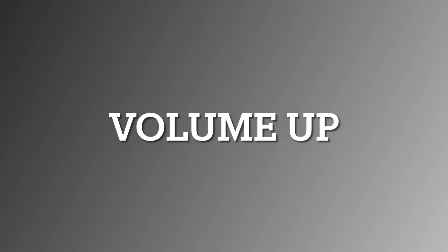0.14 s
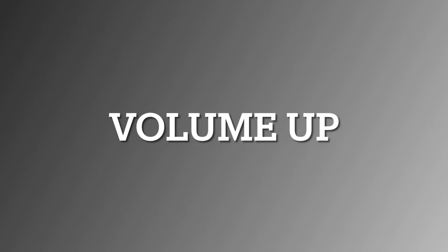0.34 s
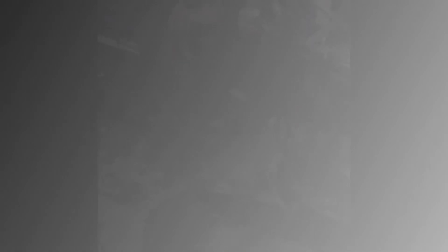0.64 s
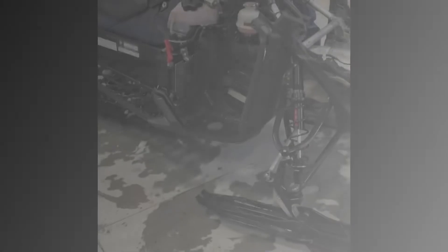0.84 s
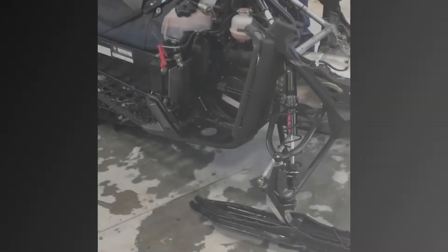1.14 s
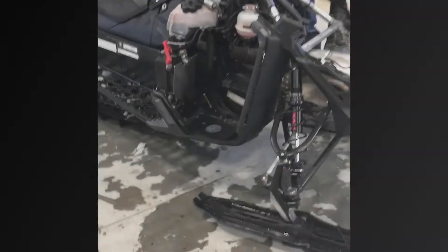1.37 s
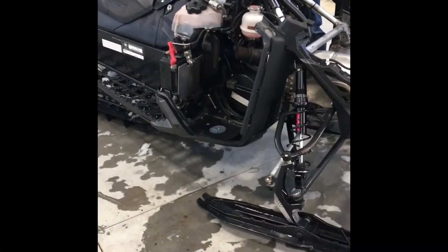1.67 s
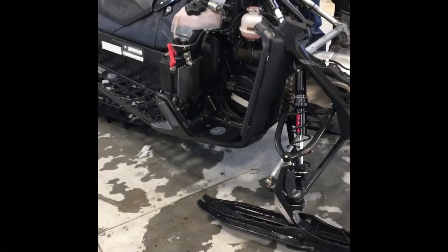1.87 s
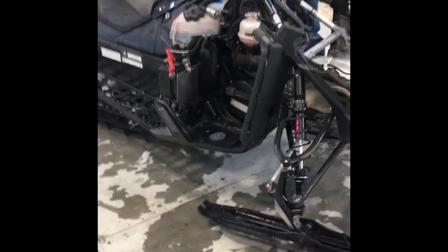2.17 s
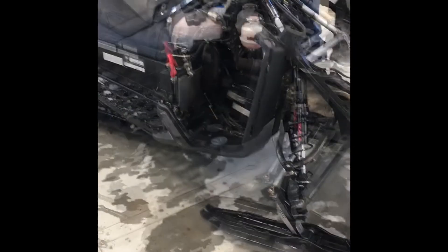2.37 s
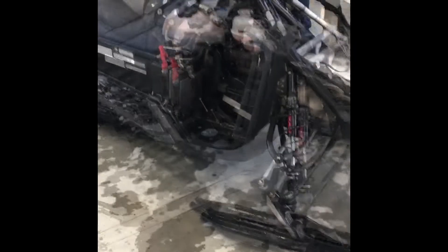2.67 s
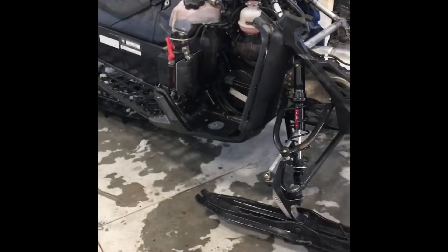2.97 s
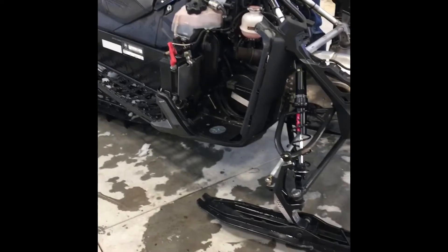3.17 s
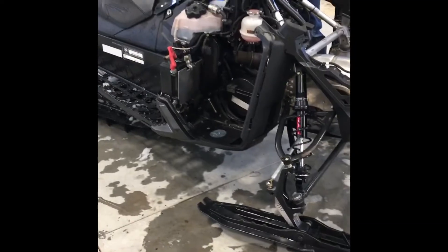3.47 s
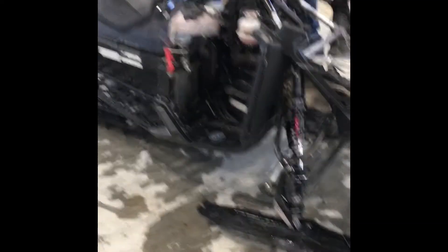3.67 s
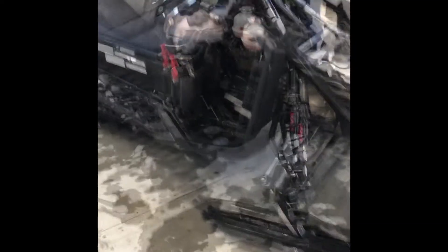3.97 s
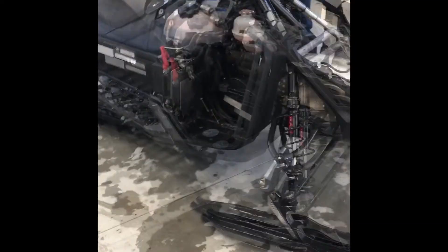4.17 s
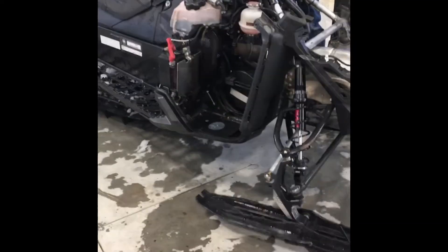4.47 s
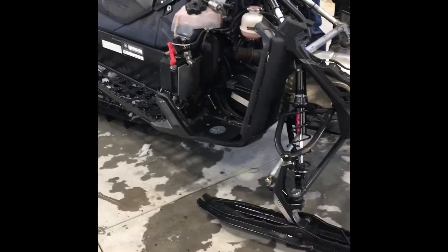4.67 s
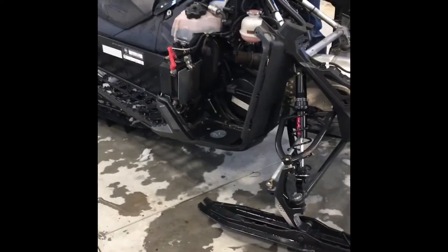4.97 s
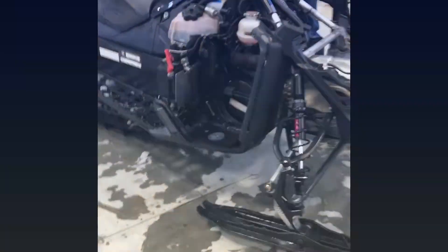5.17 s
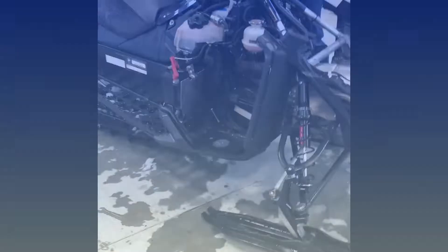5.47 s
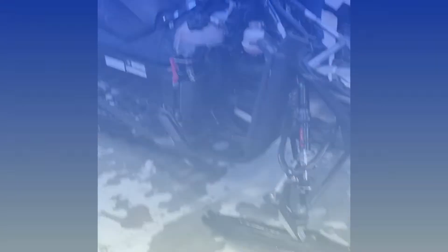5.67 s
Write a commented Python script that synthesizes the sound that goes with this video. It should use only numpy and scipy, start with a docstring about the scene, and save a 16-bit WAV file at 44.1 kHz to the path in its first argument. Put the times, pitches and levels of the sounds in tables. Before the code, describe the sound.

After a brief silence, an open-piped two-stroke snowmobile engine fades in fast under harsh, stuttering hiss bursts. Its level suddenly dips, then swells back to a loud, buzzy, slightly wandering idle with metallic rattle. Switched off, it sinks through slowing low puffs to a small knock. The same run comes three times, each start overlapping the previous stop. Close microphone in a hard, reverberant workshop.

```python
"""In a reverberant workshop an unmuffled two-stroke snowmobile engine idles at about 49 firings a second.
It fades in under harsh hissing bursts, dips in level, idles, is switched off, and friction brakes it to a stop.
Pulses timed by the crank ring the pipe and panels and gate coloured noise; sinking tones make the run-down.
This one short run is heard three times in a loop, each start overlapping the previous stop."""
import sys
import numpy as np
from scipy import signal
from scipy.fft import rfft, irfft, next_fast_len
from scipy.io import wavfile
from scipy.ndimage import uniform_filter1d

SR = 44100
rng = np.random.default_rng(int(sys.argv[2]) if len(sys.argv) > 2 else 0)


def dump_mix(stems):
    """Bounce the given channels to the path in sys.argv[1] as a 16-bit WAV at rate SR."""
    frames = np.atleast_2d(stems).T  # one column per channel
    limited = np.clip(frames, -1, 1)  # hard clip at full scale
    pcm = np.round(limited * 32767).astype(np.int16)
    wavfile.write(sys.argv[1], SR, pcm)


N = 257089
T = np.arange(N) / SR  # time of each sample (s)

# The wandering idle. Each row: time in seconds, speed in firings per second.
IDLE_SPEED = [(0.6, 48.11), (0.7, 48.94), (0.85, 48.05), (1.02, 48.85), (1.17, 50.33), (1.25, 49.86),
              (1.33, 48.71), (1.42, 49.85), (1.55, 49.85), (1.75, 50.2), (1.96, 48.4), (2.1, 49.06),
              (2.37, 48.23)]
# Hissing bursts. Each row: start in seconds, length in seconds, relative level in dB.
HISS_BURSTS = [(0.616, 0.017, -54), (0.637, 0.041, -48), (0.687, 0.033, -44), (0.737, 0.019, -43),
               (0.757, 0.034, -38), (0.788, 0.061, -49.5), (0.841, 0.013, -36), (0.857, 0.022, -33.5)]
# A loose part chinks. Each row: start in seconds, level in dB.
CHINKS = [(1.032, -67), (1.131, -56), (1.757, -52.5), (1.873, -57)]
# The exhaust pipe's response. Each row: multiple of 49.3 Hz, gain in dB.
PIPE_HARMONICS = [(1, -7.5), (2, -10.5), (3, -7.5), (4, -15.5), (5, -7.5), (6, -15), (7, 4.5), (8, -7),
                  (9, -16.5), (10, -2.5), (11, -21), (12, -27), (13, -25), (14, -19)]
# Colour of the port's crack. Each row: frequency in Hz, relative level in dB per Hz.
BARK_COLOUR = [(400, -31), (600, -3), (660, -7.5), (720, -5), (880, -7.5), (980, -4.5), (1110, -6.5),
               (1480, -5.5), (1700, -19), (2000, -18.5), (2450, -14), (2800, -26), (3200, -34),
               (8000, -110)]
# Colour of the mechanical rattle. Each row: frequency in Hz, relative level in dB per Hz.
CLATTER_COLOUR = [(1500, -37), (2800, 10), (3400, -1), (4000, 4.5), (4500, -1.5), (5000, 0.5), (6700, 2),
                  (7800, 0), (8900, -1), (10400, -6), (12300, -4), (15800, -14)]
# Colour of the hissing bursts. Each row: frequency in Hz, relative level in dB per Hz.
HISS_COLOUR = [(400, -28), (700, -5.5), (1200, 19.5), (1500, 3), (1800, -3.5), (2500, 9.5), (3200, -8),
               (3700, -13.5), (5500, -10.5), (7000, -2), (9200, -1), (10400, -10), (13000, -7),
               (15800, -18)]
# Colour of the uneven combustion. Each row: frequency in Hz, relative level in dB per Hz.
CHURN_COLOUR = [(30, -44), (70, -16.5), (120, -10.5), (190, -12), (245, -4.5), (295, -11), (350, -10.5),
                (440, -5.5), (500, -7), (580, -15), (900, -25.5), (3000, -100)]
# Ringing metal parts. Each row: frequency in Hz, width in Hz, gain in dB.
METAL_MODES = [(3690, 50, -2), (3970, 110, 0), (4380, 70, 0), (4540, 70, 2), (6750, 120, -2),
               (8850, 120, -1)]
# Resonances of pipe walls and body panels. Each row: frequency in Hz, width in Hz, gain in dB.
PANEL_MODES = [(143, 14, 1), (245, 30, 4), (624, 18, -8), (878, 12, 1), (1080, 14, 0), (1122, 18, 0),
               (1172, 16, -2), (1325, 36, -8), (2722, 26, -4.5), (3660, 70, -18)]
# Loose side panels that boom when a low idle meets their pitch.
# Each row: frequency in Hz, width in Hz, gain in dB.
BOOM_MODES = [(143.1, 4.7, -5), (244, 7, -1.5), (870, 4.8, -5)]
# Standing waves of the room. Each row: frequency in Hz, width in Hz, gain in dB.
STANDING_WAVES = [(240, 5, 4), (249, 4, 3), (340, 3.5, -12), (386, 4, -1), (402, 4, -3), (478, 4, 2),
                  (491, 4, -3)]
# The workshop's reverberation. Each row: frequency in Hz, time to die by 60 dB in seconds.
WORKSHOP_T60 = [(60, 0.45), (240, 1.85), (500, 1.67), (1400, 1.62), (3500, 1.92), (8000, 0.8), (15000, 0.5)]

LOOP_S = 22 / 15  # spacing of the repeats
START, CUT = 0.57, 2.438  # the engine begins to fade in; the firings have died away (s)
FADE_IN_S, SPARK_FADE_S = 0.36, 0.066  # rise of the running engine; weakening of the firings before CUT
DIP_AT, DIP_FALL_S, DIP_RECOVER_S = 0.872, 0.027, 0.27  # start of the dip (s), its fall, its recovery constant
EASE_AT = 1.99  # from here the level eases off towards the stop (s)
PULL_DB, PULL_SMOOTH_S = 0.1661, 0.049  # drone gain per (firing/s) gained each second; its smoothing
STOP, FRICTION_HZ_PER_S = 2.852, 117.6  # standstill (s); strokes per second lost each second on the way
PUMP_AT, PUMP_HZ, PUMP_SINK_S = 2.36, 144.7, 0.57  # pitch starts to fall (s), first pitch, time constant
PUMP_PEAK_AT, PUMP_SWELL_S, PUMP_DB = 2.455, 0.085, -35  # loudest moment (s), half width, peak level
PUFF_DB, PUFF_CYCLES = -32.5, 0.75  # peak level of a full puff; its half length in cycles
PUFF_WEAK_HZ = 10  # crank speed around which puffs weaken
LAST_STROKE = 0.23  # share of a stroke that the crank still turns after the last puff
TOP_HZ = 15900  # band limit


def amp(db):
    """Decibels to gain."""
    return 10 ** (np.asarray(db) / 20)


def unit(x):
    """Scale to rms 1 while the engine runs."""
    running = x[(T > START) & (T < CUT)]
    return x / np.sqrt(np.mean(running ** 2) + 1e-20)


def along(points, hz):
    """Read (Hz, value) points on a log frequency axis."""
    f, value = np.transpose(points)
    return np.interp(np.log(hz + 1), np.log(f + 1), value)


def ramp(start, length_s):
    """A straight rise from 0 to 1."""
    return np.clip((T - start) / length_s, 0, 1)


def noise():
    """Fresh white noise."""
    return rng.standard_normal(N)


def filtered(x, response):
    """x times a complex response of frequency."""
    size = next_fast_len(N + SR // 2)
    hz = np.fft.rfftfreq(size, 1 / SR)
    return irfft(rfft(x, size) * response(hz), size)[:N]


def coloured(x, points, size=16384):
    """x through the causal, minimum-phase filter that has this (Hz, dB) spectrum."""
    gain = amp(along(points, np.fft.rfftfreq(size, 1 / SR)))
    cepstrum = irfft(np.log(gain))
    # folding the cepstrum forward makes the filter causal
    cepstrum[1:size // 2] *= 2
    cepstrum[size // 2 + 1:] = 0
    impulse = irfft(np.exp(rfft(cepstrum)))[:size // 2]
    return signal.fftconvolve(x, impulse)[:N]


def resonances(modes):
    """The summed response of (Hz, width Hz, dB) resonances."""
    def response(f):
        return sum(amp(db) * 1j * f * w / (c * c - f * f + 1j * f * w) for c, w, db in modes)
    return response


def delayed(x, lag_s):
    """x arriving a little later."""
    return filtered(x, lambda hz: np.exp(-2j * np.pi * hz * lag_s))


def workshop(x):
    """The room's answer: a decaying noise tail, each frequency dying at its own speed."""
    hz, t, grains = signal.stft(rng.standard_normal(SR), SR, nperseg=256)
    decay = amp(-60 * t / along(WORKSHOP_T60, hz)[:, None])
    tail = signal.istft(grains * decay, SR, nperseg=256)[1]
    return signal.fftconvolve(x, tail / np.linalg.norm(tail))[:N]


def in_room(x, wet_db):
    """A running sound plus the room's answer, at rms 1."""
    return unit(unit(x) + amp(wet_db) * unit(workshop(x)))


def idle_speed():
    """The wandering idle at every sample (firings per second)."""
    s, speed = np.transpose(IDLE_SPEED)
    return np.interp(T, s, speed)


def crank():
    """Firings counted over time, one at each whole number: the crank idles, then friction brakes it evenly."""
    speed = np.clip(FRICTION_HZ_PER_S * (STOP - T), 0, idle_speed())
    count = np.cumsum(speed) / SR
    return count - np.interp(1.6095, T, count)  # count zero falls at 1.6095 s


def firings(turn, jitter_s, scatter_db):
    """One pulse per firing, a little off in time and size; the last ones weaken."""
    whole = np.arange(-60, 45)
    chance = rng.standard_normal((len(whole), 2))
    s = np.interp(whole, turn, T) + jitter_s * chance[:, 0]
    size = amp(scatter_db * chance[:, 1]) * np.clip((CUT - s) / SPARK_FADE_S, 0, 1)
    # windowed sinc pulses land between samples
    taps = np.floor(s * SR).astype(int)[:, None] + np.arange(-7, 9)
    off = taps - s[:, None] * SR
    pulse = size[:, None] * np.sinc(off) * np.sinc(off / 8)
    return np.bincount(taps.ravel(), pulse.ravel(), N)


def gated(pulses, decay_s, steady):
    """Noise that flares with each pulse, over a steady share that fades as the engine coasts."""
    flare = np.abs(signal.lfilter([1], [1, -np.exp(-1 / (decay_s * SR))], pulses))
    coasting = amp(-55 * np.maximum(T - CUT + SPARK_FADE_S, 0))
    return unit(noise() * (unit(flare) + steady * coasting))


def level(idle_db, harsh_db, dip_db, ease_db_per_s):
    """A layer's gain: fade-in, an offset under the bursts, a dip, recovery to idle, then easing off."""
    dropped = ramp(DIP_AT, DIP_FALL_S)
    dip = np.exp(-np.maximum(T - DIP_AT - DIP_FALL_S, 0) / DIP_RECOVER_S)
    db = idle_db + harsh_db * (1 - dropped)
    db = db - dip_db * dropped * dip
    db = db - ease_db_per_s * np.maximum(T - EASE_AT, 0)
    return ramp(START, FADE_IN_S) * amp(db)


def pull():
    """Strong firings speed the crank up and sound louder; weak ones let it sag: gain follows acceleration."""
    gaining = np.gradient(idle_speed()) * SR
    return amp(PULL_DB * uniform_filter1d(gaining, int(PULL_SMOOTH_S * SR)))


def exhaust(turn):
    """Pressure pulses ring the open pipe: a thud below, a drone near 350 Hz above."""
    pulses = unit(firings(turn, jitter_s=.00008, scatter_db=.9))
    harmonics = [(49.3 * k, db) for k, db in PIPE_HARMONICS]
    pipe = [(25, -40)] + harmonics + [(900, -60), (3000, -120)]
    blast = coloured(pulses, pipe)

    def low(hz):
        return 1 / (1 + (hz / 200) ** 12)

    # the pipe passes its deeper tones later than the crack of the port
    thud = delayed(filtered(blast, low), lag_s=0.0047)
    drone = delayed(filtered(blast, lambda hz: 1 - low(hz)), lag_s=0.0015)
    # standing waves swell and beat as the idle speed wanders past them
    drone = drone + filtered(drone, resonances(STANDING_WAVES))
    # uneven combustion churns between the harmonics
    churn = coloured(gated(pulses, decay_s=0.025, steady=1.0), CHURN_COLOUR)
    drone = in_room(drone, wet_db=-11) + amp(-11.5) * in_room(churn, wet_db=7.5)

    thud_gain = level(idle_db=-32.5, harsh_db=1.0, dip_db=12.5, ease_db_per_s=4.5)
    drone_gain = level(idle_db=-24.0, harsh_db=-3.5, dip_db=17.5, ease_db_per_s=12) * pull()
    return thud_gain * in_room(thud, wet_db=-14) + drone_gain * drone


def bark(turn):
    """The port opens with a sharp crack and a puff of turbulent gas; both shake the panels."""
    pulses = firings(turn, jitter_s=.00003, scatter_db=1.4)
    gas = unit(pulses) + amp(-6.5) * gated(pulses, decay_s=.006, steady=.4)
    crack = coloured(gas, BARK_COLOUR)
    crack = crack + amp(6) * filtered(crack, resonances(PANEL_MODES))
    gain = level(idle_db=-35.0, harsh_db=6.0, dip_db=16, ease_db_per_s=11.5)
    return gain * in_room(crack, wet_db=6.5)


def boom(turn):
    """The firings shake the side panels, most under the bursts and when the idle is slow."""
    pulses = firings(turn, jitter_s=.00003, scatter_db=1)
    shake = filtered(pulses, resonances(BOOM_MODES))
    return level(idle_db=-48.5, harsh_db=13.0, dip_db=10, ease_db_per_s=8) * unit(shake)


def clatter(turn):
    """Pistons and clutch rattle unevenly in step with the crank and ring the metal parts."""
    knocks = firings(turn - .15, jitter_s=0.005, scatter_db=5.5)  # 0.15 of a firing later
    rattle = coloured(gated(knocks, decay_s=0.017, steady=1.0), CLATTER_COLOUR)
    rattle = rattle + filtered(rattle, resonances(METAL_MODES))
    gain = level(idle_db=-57.5, harsh_db=12.0, dip_db=13.5, ease_db_per_s=11.5)
    return gain * in_room(rattle, wet_db=-5.5)


def hiss(turn):
    """Harsh bursts of noise that start with a spit, throb with the engine and ring the panels."""
    gate = np.zeros(N)
    for s, length, db in HISS_BURSTS:
        age = np.maximum(T - s + 0.0025, 0)  # the attack leads by 2.5 ms
        spit = 1 + .3 * np.exp(-age / .005)
        attack = np.clip(age / 0.0012, 0, 1)
        release = np.exp(-np.maximum(age - length, 0) / 0.003)
        gate += amp(db) * spit * attack * release
    pulses = firings(turn, jitter_s=.0003, scatter_db=1.5)
    rush = unit(coloured(gated(pulses, decay_s=.012, steady=3.6), HISS_COLOUR))
    ring = unit(filtered(gated(pulses, decay_s=0.0011, steady=1), resonances(PANEL_MODES)))
    return gate * (amp(0.8) * rush + amp(2.5) * ring)


def chatter():
    """Now and then a loose part chinks against the frame: decaying noise through metal resonances."""
    shakes = np.zeros(N)
    for s, db in CHINKS:
        shakes += amp(db) * (T > s) * np.exp(-np.maximum(T - s, 0) / 0.0088)
    return shakes * unit(filtered(noise(), resonances(METAL_MODES[2:])))


def pump_pitch(s):
    """The pumping note sinks as the crank slows (Hz)."""
    return PUMP_HZ * np.exp(-np.maximum(s - PUMP_AT, 0) / PUMP_SINK_S)


def puffs(count):
    """The last unfired strokes come ever further apart, lower and weaker."""
    # under even braking, the time left grows with the root of the strokes left
    strokes_left = np.arange(count) + LAST_STROKE
    left_s = np.sqrt(2 * strokes_left / FRICTION_HZ_PER_S)[:, None]
    size = 1 - np.exp(-FRICTION_HZ_PER_S * left_s / PUFF_WEAK_HZ)
    cycles = (T - STOP + left_s) * pump_pitch(STOP - left_s)
    puff = size * np.cos(2 * np.pi * cycles) * np.exp(-(cycles / PUFF_CYCLES) ** 2)
    return amp(PUFF_DB) * np.sum(puff, axis=0)


def dying_tone(start, hz, db, t60_s):
    """A sine that starts at once and dies by 60 dB in t60_s."""
    age = np.maximum(T - start, 0)
    return amp(db) * np.sin(2 * np.pi * hz * age) * amp(-60 * age / t60_s)


def run_down():
    """Without spark the pumping note glides down, breaks into single puffs and ends in one small knock."""
    swell = np.exp(-((T - PUMP_PEAK_AT) / PUMP_SWELL_S) ** 2)
    phase = 2 * np.pi * np.cumsum(pump_pitch(T)) / SR
    note = amp(PUMP_DB) * swell * np.sin(phase)
    click = dying_tone(STOP, hz=420, db=-30, t60_s=0.0082)
    tick = dying_tone(STOP, hz=3000, db=-45, t60_s=.002)
    knock = dying_tone(STOP + 0.0035, hz=88, db=-34.5, t60_s=0.081)
    return note + puffs(count=7) + knock + click + tick


def scene():
    """One run from fade-in to standstill, looped three times."""
    turn = crank()
    running = exhaust(turn) + bark(turn) + boom(turn) + clatter(turn) + hiss(turn) + chatter()
    stopping = run_down()
    run = running + stopping + amp(-14) * workshop(stopping)
    starts = [round(k * LOOP_S * SR) for k in range(3)]
    return sum(np.pad(run, (start, 0))[:N] for start in starts)[None]


def record(dry):
    """Nothing is kept above the band limit."""
    return filtered(dry[0], lambda hz: hz < TOP_HZ)[None]


dry = scene()
out = record(dry)
dump_mix(out)
```